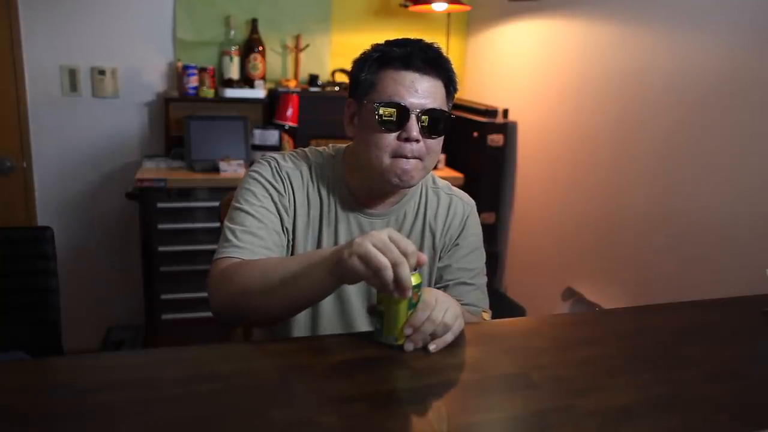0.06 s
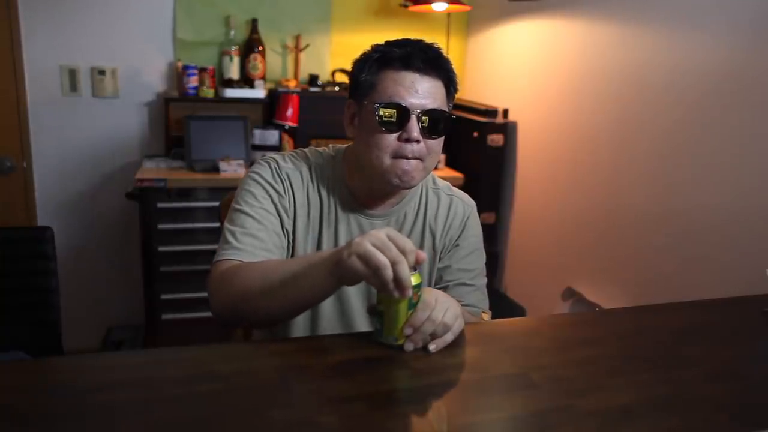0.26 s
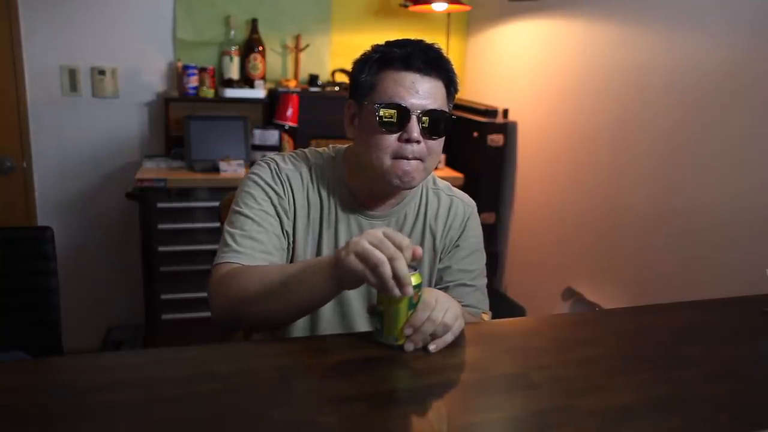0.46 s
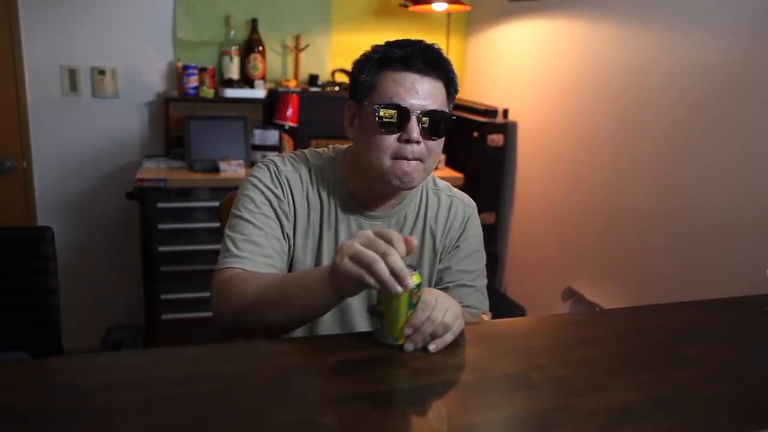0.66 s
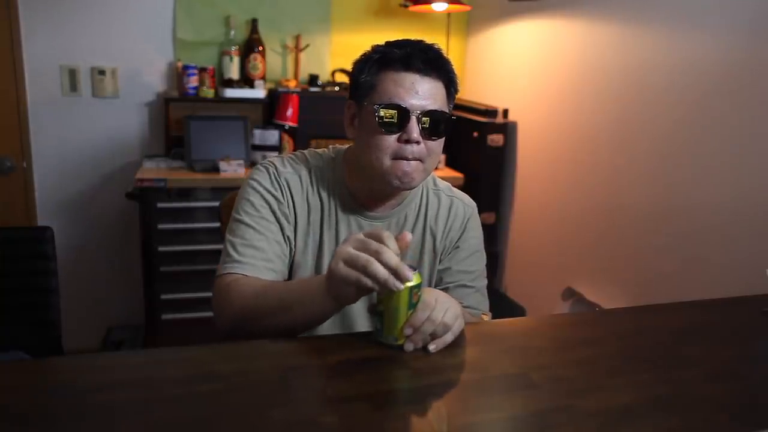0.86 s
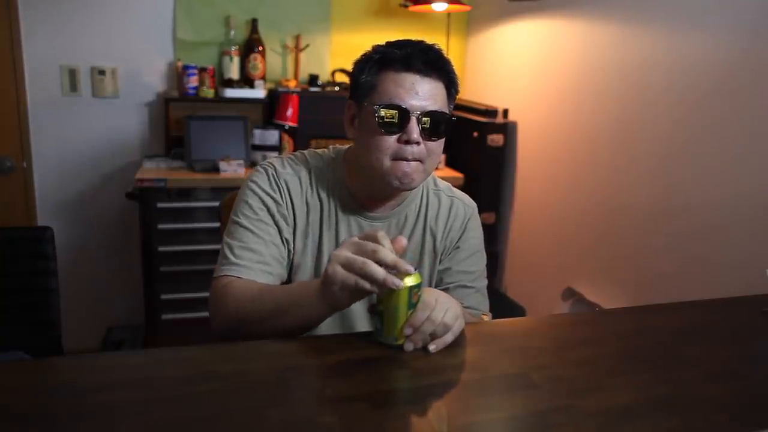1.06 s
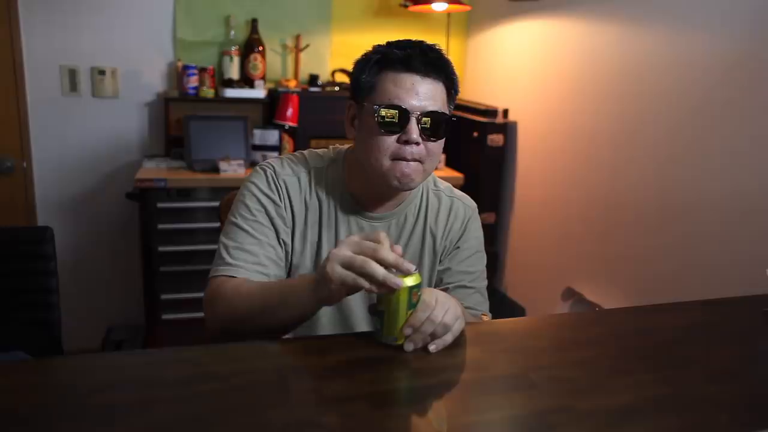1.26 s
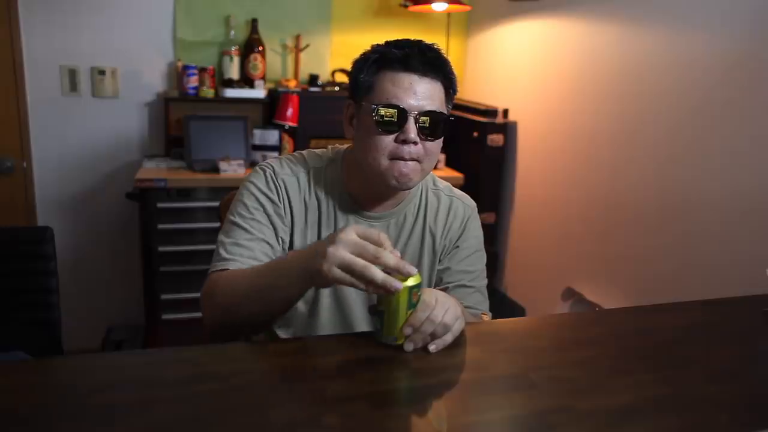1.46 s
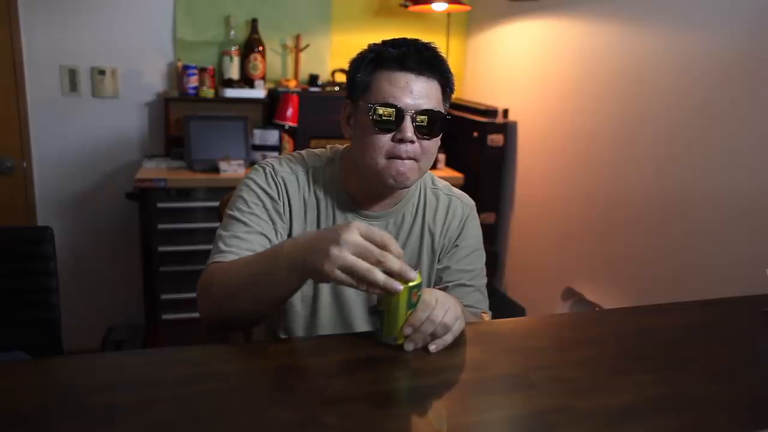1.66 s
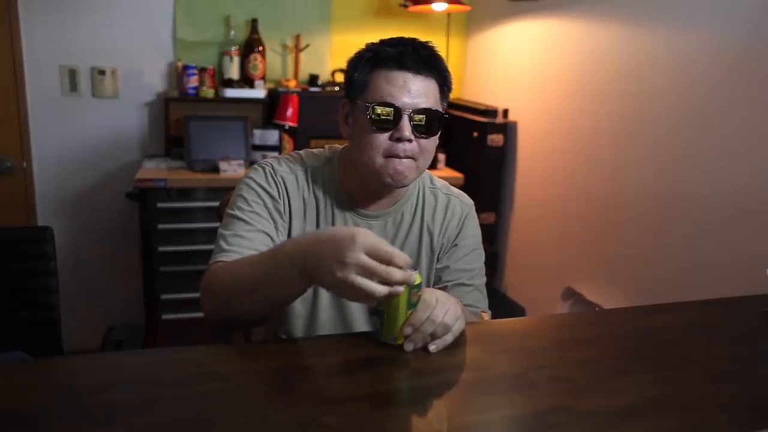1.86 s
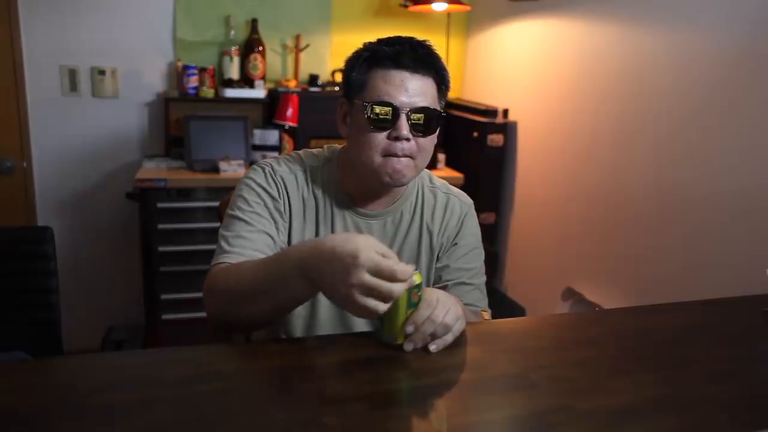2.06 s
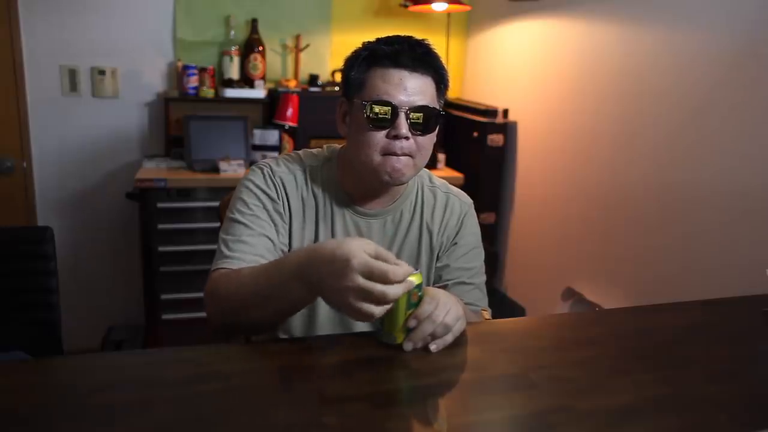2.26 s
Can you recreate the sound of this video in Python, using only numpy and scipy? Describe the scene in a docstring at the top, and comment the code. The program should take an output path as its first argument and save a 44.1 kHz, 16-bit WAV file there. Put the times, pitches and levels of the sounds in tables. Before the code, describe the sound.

A drink can is cracked open, followed by tab snaps over a faint fizz.

```python
"""A sharp pop, then a metallic rip: a drink can is opened at a wooden table in a small, quiet room.
The tab breaks the seal, then tears the scored lid: two cascades of slips that ring the lid and drive
a fast limiter. Gas escapes in one puff, the can rings hollow and the table resonates under it.
Fingers scrape and click the tab over a faint fizz; a low rumble dies away at the start."""
import sys
import numpy as np
from scipy import signal
from scipy.io import wavfile
from scipy.ndimage import uniform_filter1d, minimum_filter1d

SR = 44100
rng = np.random.default_rng(int(sys.argv[2]) if len(sys.argv) > 2 else 0)


def master(y):
    """Save y as 16-bit WAV."""
    cut = np.clip(np.atleast_2d(y).T, -1, 1)
    pcm = np.round(cut * 32767)  # scale
    wavfile.write(sys.argv[1], SR, pcm.astype(np.int16))


N = 105840
TIME = np.arange(N) / SR

# Slips of the metal. Each row: start in seconds, crackle in dB, decay time in seconds, lid ring in dB.
POP_SLIPS = [(.2186, -25, .0015, -44.5), (.2247, -19, .002, -30), (.2299, -7.5, .004, -6.5),
             (.2345, 3, .006, -16.5), (.2424, -12, .005, -22.5), (.2462, 3, .004, -24.5),
             (.2522, -3, .0015, -25), (.2632, -7.5, .002, -28.5), (.2712, -13.5, .002, -20.5),
             (.2825, -15, .005, -29), (.307, -35.5, .006, -30)]
TEAR_SLIPS = [(.429, -54.5, 0.0054, -61.5), (.4376, -38, .003, -39), (.440, -27, .003, -30.5),
              (.4426, -2.5, .005, -27), (.4448, -11.5, .005, -8), (.4502, -4.5, .005, -14.5),
              (.4527, -1, .004, -17), (.458, -12.5, .004, -22), (.4625, -12.5, .004, -18),
              (.4655, -14, .003, -21.5), (.4675, -8.5, .0015, -13), (.481, -18, 0.018, -25),
              (.505, -19.5, .004, -42)]
# Modes of the lid. Each row: frequency in Hz, relative level in dB.
CLOSED_LID_MODES = [(1665, -2.5), (1743, 1.5), (1847, -7.5), (2056, -12.5), (2085, -7.5), (2337, -11),
                    (2461, -6.5), (3400, -1), (3765, -6.5), (3975, -2.5), (4808, -17.5), (5290, -2.5),
                    (5555, -14), (7990, 0)]
OPEN_LID_MODES = [(1060, -8.5), (1178, -6), (2720, -14.5), (3420, 0.5), (3585, -8.5), (3672, -5), (3761, 1),
                  (3811, -1.5), (4397, -11), (4505, -5), (5892, -14), (6492, -8.5), (6598, -10),
                  (8520, -13)]
# Modes of table and tab. Each row: frequency in Hz, relative level in dB, T60 in seconds.
TABLE_MODES = [(172, -5, .17), (195, -4, .13), (235, -1, .09), (365, 1, .09), (450, -4, .08),
               (660, -11, .07)]
TAB_MODES = [(436, -14, .14), (1300, 0, .048), (2864, -16, .04), (3700, -12, .05), (7197, -16, .04)]
# Impulses that excite them. Each row: start in seconds, level in dB.
TABLE_KNOCKS = [(0.23, -37), (0.442, -31), (1.1909, -59.5), (1.5202, -63.5), (2.0786, -56.5)]
TAB_CLINKS = [(1.1915, -46), (2.336, -44)]
# Snaps of the tab. Each row: start in seconds, level in dB, resonance in Hz, its height in dB,
# tilt in dB per octave.
TAB_CLICKS = [(.680, -32, 1420, 12, -9), (0.8239, -34.5, 7000, 0, 1), (0.8613, -27, 2680, -3, 0.5),
              (0.9141, -33.5, 1370, 7, -9.5), (0.9954, -34.5, 8000, 1, 16), (1.1917, -8.5, 4590, 11, 0.5),
              (1.337, -44, 9150, 12, 6), (1.360, -40.5, 3500, 1.5, -6), (1.5201, -24, 2370, -5, -6.5),
              (1.7378, -15, 2590, 26, 4.5), (1.742, -17.5, 4500, 13, -2.5), (2.0785, -0.5, 2550, 6, -1),
              (2.303, -35, 4323, 12, -4.5), (2.335, -37, 2790, 18, -4)]
# Finger strokes. Each row: peak time in seconds, level in dB, rise and fall times in seconds.
STROKES = [(.685, -64.5, .02, 0.0072), (0.836, -56, 0.0058, 0.0036), (0.853, -44.5, 0.0086, 0.013),
           (.93, -74, 0.034, 0.0082), (1.39, -70, 0.05, 0.043), (1.519, -40, 0.0013, 0.0044),
           (1.515, -56, 0.019, 0.016), (1.662, -59, 0.0068, 0.044), (1.70, -61, 0.031, .03),
           (1.733, -40, 0.005, .004), (1.741, -39, 0.0046, 0.0045)]
# Envelopes. Each row: time in seconds, level in dB.
FIZZ_ENVELOPE = [(0, -107), (.45, -99), (.55, -68), (.63, -68.5), (.72, -69), (.78, -78), (.92, -68.5),
                 (1.05, -67.5), (1.12, -76), (1.5, -74.5), (1.9, -75.5), (2.4, -71)]
RUMBLE_ENVELOPE = [(0, -47), (.035, -53), (.06, -58.5), (.12, -58), (.21, -66.5), (.4, -78), (.68, -65),
                   (.85, -73)]
# Spectra of the sources. Each row: frequency in Hz, relative level in dB.
POP_SPECTRUM = [(30, -37), (500, -29.5), (750, -20), (930, -19.5), (1100, -7), (1350, -8.5), (1750, 5),
                (2400, -3), (3600, 4.5), (5500, 4), (8100, -0.5), (9300, -6), (10500, -3.5), (13000, -13.5),
                (16000, -19.5)]
TEAR_SPECTRUM = [(30, -39), (110, -42), (210, -10.5), (700, -22.5), (1150, -3.5), (1500, -6), (2700, -3.5),
                 (3100, -8), (3700, 1), (5000, -7.5), (6500, 3), (8300, 0), (10000, -9.5), (13000, -12.5),
                 (16000, -22.5)]
CAVITY_SPECTRUM = [(100, -45.5), (540, -25.5), (655, 1.5), (720, -11.5), (800, 1), (900, -9), (1200, -24.5),
                   (1750, 4), (2200, -11.5), (4000, -30), (16000, -62)]
CLICK_SPECTRUM = [(40, -33), (190, -35), (350, -18.5), (650, -24.5), (1000, -20.5), (1350, -2.5),
                  (1900, -4.5), (2400, -1.5), (3300, 1), (4000, -5.5), (5500, -6), (7000, 1.5), (9000, -11),
                  (12500, -20.5), (16000, -28.5)]
SCRAPE_SPECTRUM = [(100, -21), (600, -16.5), (1000, -11.5), (1350, 6.5), (2000, 0), (2700, 12.5),
                   (3600, -11.5), (4600, 4), (5400, -9), (6500, 1), (8000, -10), (11000, -17), (16000, -44)]
FIZZ_SPECTRUM = [(300, -16), (1300, 6.5), (2100, -6), (2700, 5), (3400, -5), (5600, -8.5), (6500, -5),
                 (7000, 3.5), (7700, -4), (12000, -8.5), (16000, -15)]
RUMBLE_SPECTRUM = [(30, -16.5), (80, 8.5), (130, -2), (280, -1.5), (380, -16.5), (680, -25), (780, -10.5),
                   (1100, -24), (1900, -25), (2400, -14), (2800, -31.5), (5000, -32.5), (15000, -54)]
ROOM_TONE_SPECTRUM = [(15, -28.5), (25, 9), (190, -2.5), (242, -9.5), (363, -7), (734, -21.5), (818, -11.5),
                      (1330, -13), (1650, -23), (1790, -13.5), (2610, -15.5), (4250, -22.5), (6740, -28.5),
                      (12500, -26.5), (16000, -36.5)]
# Reverberation of the room. Each row: frequency in Hz, T60 in seconds.
ROOM_T60 = [(100, .3), (400, 0.13), (1000, 0.18), (2700, 0.16), (7000, 0.18), (15000, 0.19)]


def lid_crack(slips, spectrum, modes, t60_s=.055, cutoff_hz=700):
    """Stick-slip fracture: each slip emits a noise burst and excites the lid's damped modes."""
    crackle, ringing = np.zeros(N), np.zeros(N)
    t = TIME[:SR // 10]
    for start, crackle_db, decay_s, ring_db in slips:
        add(crackle, start, amp(crackle_db) * np.exp(-t / decay_s) * rng.standard_normal(len(t)))
        for hz, mode_db in modes:
            add(ringing, start, amp(ring_db) * rng.choice([-1, 1]) * ring([(hz, mode_db, t60_s)]))
    # the small lid radiates little below the cutoff
    radiation = signal.butter(2, cutoff_hz, "high", fs=SR, output="sos")
    return colour(crackle, spectrum) + signal.sosfilt(radiation, ringing)


def gas_puff(at_s=.2316, width_s=.00027, pulse_db=-9.5, cavity_db=-33.5, t60_s=.41):
    """Cavity resonance: one pulse of escaping gas leaves a rough, hollow ring in the can."""
    out = amp(pulse_db) * np.exp(-((TIME - at_s) / width_s) ** 2)
    dying_noise = rng.standard_normal(N) * decay(TIME, t60_s)
    add(out, at_s, amp(cavity_db) * colour(dying_noise, CAVITY_SPECTRUM))
    return out


def tab_clicks(chatter_db=-3, chatter_peak_s=.00065, width_octaves=.33):
    """Impact: the tab hits the lid with an impulse and a brief chatter, shaped by a resonance."""
    out, t = np.zeros(N), TIME[:SR // 50]
    for start, db, centre_hz, peak_db, tilt_db in TAB_CLICKS:
        def emphasis_db(hz):
            octaves = np.log2(np.maximum(hz, 500) / centre_hz)
            return peak_db * np.exp(-(octaves / width_octaves) ** 2) + tilt_db * octaves

        chatter = rng.standard_normal(len(t)) * t * np.exp(-t / chatter_peak_s)
        force = (t == 0) + amp(chatter_db) * chatter / np.linalg.norm(chatter)
        tick = impulse_response(CLICK_SPECTRUM, emphasis_db)
        add(out, start, amp(db) * signal.fftconvolve(force, tick))
    return out


def struck_body(strikes, modes):
    """Free vibration: the released tab, or the table under the can, rings after each impulse."""
    out = np.zeros(N)
    for start, db in strikes:
        add(out, start, amp(db) * ring(modes))
    return out


def finger_scrapes(slips_per_s=4400):
    """Friction: fingers drag over the tab in dense, tiny slips that swell and fade with pressure."""
    pressure = sum(amp(db) * np.exp(-np.maximum((peak_s - TIME) / rise_s, (TIME - peak_s) / fall_s))
                   for peak_s, db, rise_s, fall_s in STROKES)
    slipping = rng.random(N) < slips_per_s / SR
    slips = slipping * rng.choice([-1, 1], N) * random_gains(spread_db=4.5)
    return colour(pressure * unit_rms(slips), SCRAPE_SPECTRUM)


def fizz(bubbles_per_s=5000):
    """Shot noise: tiny bubbles burst at random inside the open can."""
    bursting = rng.random(N) < bubbles_per_s / SR
    bubbles = bursting * rng.standard_normal(N) * random_gains(spread_db=4)
    return colour(unit_rms(bubbles) * envelope(FIZZ_ENVELOPE), FIZZ_SPECTRUM)


def whistle(start_s=.94, length_s=.23, from_hz=880, to_hz=825, db=-69, blur_s=.0089):
    """Amplitude modulation: slow noise blurs a very faint, falling tone."""
    progress = np.clip((TIME - start_s) / length_s, 0, 1)
    swell = np.sqrt(np.abs(np.sin(np.pi * progress)))
    waver = unit_rms(uniform_filter1d(rng.standard_normal(N), round(blur_s * SR)))
    hz = from_hz + (to_hz - from_hz) * progress
    return amp(db) * waver * swell * np.sin(2 * np.pi * np.cumsum(hz) / SR)


def background(room_tone_db=-67):
    """Filtered noise: a low rumble fades at the start over steady room tone."""
    rumble = colour(rng.standard_normal(N), RUMBLE_SPECTRUM) * envelope(RUMBLE_ENVELOPE)
    return rumble + amp(room_tone_db) * colour(rng.standard_normal(N), ROOM_TONE_SPECTRUM)


def room(x, wet_db, gap_s=.001, build_s=.004):
    """Reverberation: a short diffuse tail follows the direct sound and dies band by band."""
    hz, t, bands = signal.stft(rng.standard_normal(SR // 2), SR, nperseg=256)
    tail = signal.istft(bands * decay(t, value_at(ROOM_T60, hz)[:, None]), SR, nperseg=256)[1]
    tail *= np.clip((TIME[:len(tail)] - gap_s) / build_s, 0, 1)
    return x + amp(wet_db) * signal.fftconvolve(x, tail / np.linalg.norm(tail))[:N]


def ring(modes):
    """Modal synthesis: a struck body sounds as a sum of damped sines."""
    t = TIME[:SR // 4]
    return sum(amp(db) * decay(t, t60_s) * np.sin(2 * np.pi * hz * t) for hz, db, t60_s in modes)


def impulse_response(spectrum, emphasis_db=lambda hz: 0, size=4096):
    """Minimum phase: the Hilbert transform turns a spectrum into a causal response of energy 1."""
    hz = np.abs(np.fft.fftfreq(size, 1 / SR))
    log_gain = np.log(amp(value_at(spectrum, hz) + emphasis_db(hz)))
    transfer = np.exp(np.conj(signal.hilbert(log_gain)))
    response = np.fft.ifft(transfer).real[:size // 2]
    return response / np.linalg.norm(response)


def colour(x, spectrum):
    """Convolution imposes a spectrum on a sound."""
    return signal.fftconvolve(x, impulse_response(spectrum))[:len(x)]


def value_at(curve, hz):
    """Interpolation on a log-frequency axis."""
    knots_hz, values = np.transpose(curve)
    return np.interp(np.log(hz + 1), np.log(knots_hz + 1), values)


def envelope(points):
    """Interpolation in dB gives a gain over time."""
    return amp(np.interp(TIME, *np.transpose(points)))


def decay(t, t60_s):
    """Exponential damping: 60 dB per T60."""
    return np.exp(-np.log(1000) * t / t60_s)


def random_gains(spread_db):
    """Capped exponential distribution in dB: many weak events, few strong."""
    return amp(spread_db * np.minimum(rng.exponential(1, N), 4))


def add(mix, start_s, sound):
    """Superposition of a sound on the mix."""
    part = mix[round(start_s * SR):][:len(sound)]
    part += sound[:len(part)]


def amp(db):
    """Decibels to amplitude."""
    return 10 ** (np.asarray(db) / 20)


def unit_rms(x):
    """Normalisation to rms 1."""
    return x / np.sqrt(np.mean(x ** 2) + 1e-20)


def scene():
    """Superposition of all sources; the cracks, the handling and the fizz reverberate."""
    pop = lid_crack(POP_SLIPS, POP_SPECTRUM, CLOSED_LID_MODES)
    tear = lid_crack(TEAR_SLIPS, TEAR_SPECTRUM, OPEN_LID_MODES)
    small_sounds = tab_clicks() + struck_body(TAB_CLINKS, TAB_MODES) + finger_scrapes() + fizz()
    reverberant = room(pop + tear, wet_db=-9) + room(small_sounds, wet_db=-7.5)
    thumps = gas_puff() + struck_body(TABLE_KNOCKS, TABLE_MODES)
    return (reverberant + thumps + whistle() + background())[None]


def record(dry, ceiling=1, limiter_s=.001, cutoff_hz=16000):
    """Peak limiting: a fast gain dip flattens the cracks, then a low-pass limits the band."""
    size = round(limiter_s * SR)
    needed_gain = np.minimum(1, ceiling / (np.abs(dry) + 1e-9))
    gain = uniform_filter1d(minimum_filter1d(needed_gain, 2 * size), size)
    lowpass = signal.firwin(511, cutoff_hz, window=("kaiser", 9), fs=SR)
    return signal.oaconvolve(dry * gain, lowpass[None], "same")


dry = scene()
out = record(dry)
master(out)
```